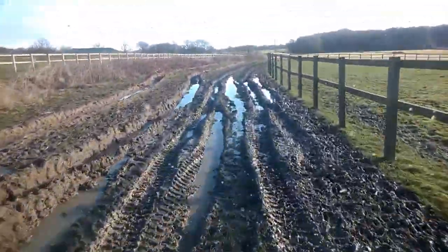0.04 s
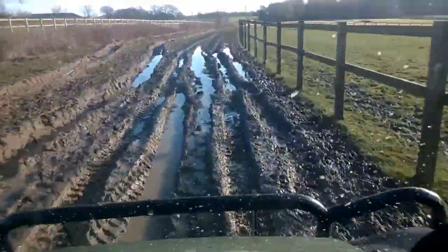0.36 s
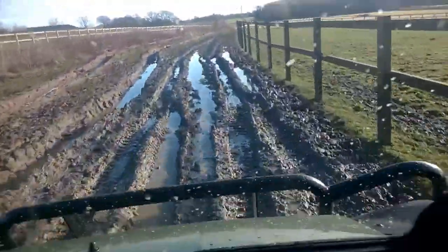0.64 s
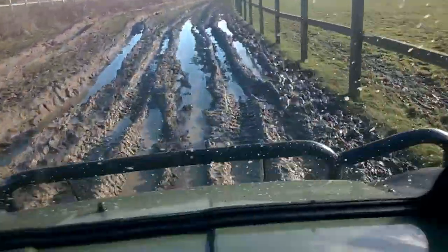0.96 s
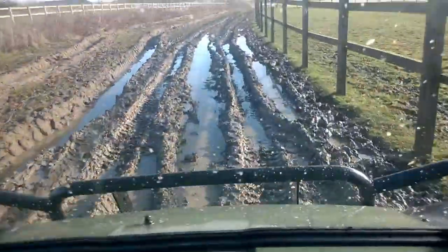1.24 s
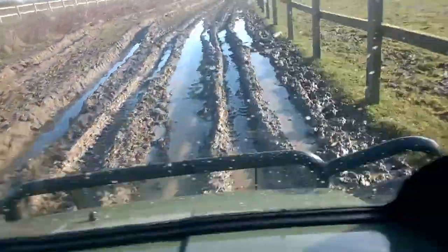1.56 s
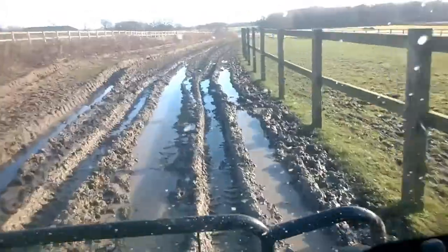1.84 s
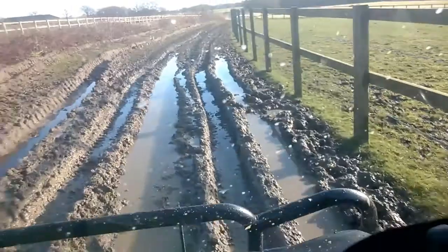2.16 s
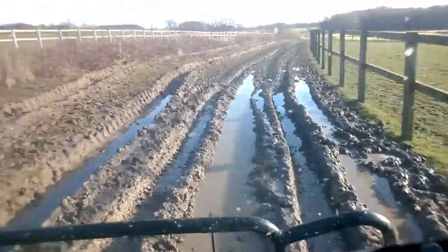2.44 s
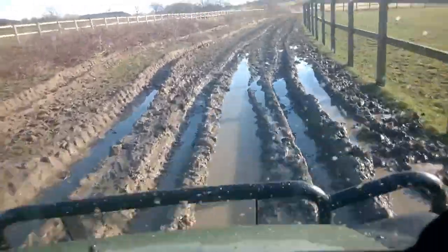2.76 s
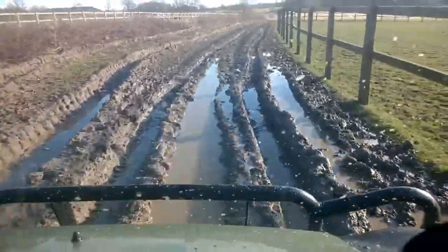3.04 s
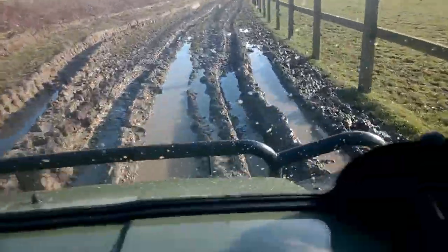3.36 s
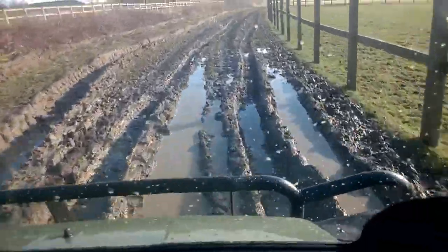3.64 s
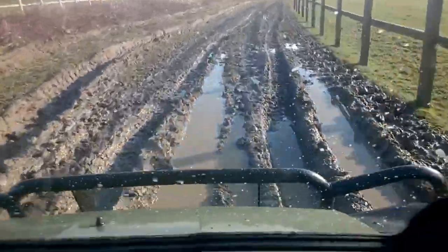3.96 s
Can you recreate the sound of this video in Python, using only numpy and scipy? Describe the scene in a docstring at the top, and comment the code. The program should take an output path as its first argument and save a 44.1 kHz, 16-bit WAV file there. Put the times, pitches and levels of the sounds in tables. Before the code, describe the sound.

An off-road vehicle's engine rumbles, heard close from inside the cab on a muddy track. It sags almost to idle, then picks up again, while faint wet tyre hiss, short splashes, a knock and metal clinks come through.

```python
"""Muddy track, inside the cab

The microphone rides in an off-road vehicle at a crawl. Close up, the engine booms through the body,
sags almost to idle and picks up again, over machinery noise and a humming cab resonance.
From outside and below come wet tyre hiss, grit and, at first, a wash of churned water.
The ruts bring short splashes, a knock, brief high swishes and a few clinks of loose metal."""
import sys
import numpy as np
from scipy import signal
from scipy.fft import rfft, irfft
from scipy.io import wavfile

SR = 44100
rng = np.random.default_rng(int(sys.argv[2]) if len(sys.argv) > 2 else 0)


def to_wav(sig):
    """Store sig (one row per channel, or 1-D mono) as 16-bit WAV at the path in sys.argv[1].

    Samples outside -1..1 are clipped; the rate is SR.
    """
    pcm = np.clip(np.atleast_2d(sig), -1, 1) * 32767
    pcm = np.round(pcm).astype(np.int16)
    wavfile.write(sys.argv[1], SR, pcm.T)  # frames by channels


N = 176400
TIME, FREQS = np.arange(N) / SR, np.fft.rfftfreq(N, 1 / SR)


def amp(db):
    """Decibels to gain."""
    return 10 ** (np.asarray(db) / 20)


def unit(x):
    """Scales to rms 1."""
    return x / np.sqrt(np.mean(x ** 2) + 1e-20)


def curve(rows, column=1):
    """One column of a time table, joined by straight lines."""
    rows = np.array(rows)
    return np.interp(TIME, rows[:, 0], rows[:, column])


def response(spectrum, hz):
    """Gain of a spectrum at the given frequencies."""
    f, db = np.transpose(spectrum)
    return amp(np.interp(np.log(hz + 1), np.log(f), db))


def colour(x, spectrum):
    """Filters x by a spectrum and scales it to rms 1."""
    return unit(irfft(rfft(x) * response(spectrum, FREQS), N))


def noise():
    """White noise."""
    return rng.standard_normal(N)


def drift(rate_hz):
    """Smooth random motion of rms 1."""
    return unit(irfft(rfft(noise()) * np.exp(-(FREQS / rate_hz) ** 2) * (FREQS > 0), N))


# Engine boom at the microphone: t/s, firing rate f/Hz, level/dB of harmonics 1, 2 and 3
FIRING = [(0, 72, -19.5, -30, -35), (.3, 71.37, -20, -36, -38), (.52, 72.36, -20.5, -35.5, -37),
          (.77, 69.73, -20, -32, -42.5), (1.12, 67.85, -19.5, -30.5, -47), (1.47, 63.4, -20.5, -49, -52.5),
          (1.8, 51.98, -21, -65, -54), (2.02, 46.22, -21.5, -60, -45), (2.16, 45.2, -22.5, -34, -40.5),
          (2.26, 53, -26, -38, -33), (2.38, 60.65, -21.5, -41.5, -36), (2.5, 62.3, -19, -35, -46),
          (2.75, 69.45, -17.5, -27, -40.5), (2.97, 60.3, -21.5, -42.5, -60), (3.1, 62.8, -18.5, -33, -67),
          (3.27, 69.3, -19, -27.5, -40), (3.55, 70.42, -18.5, -27, -39), (4, 75.7, -19, -30, -40)]
# Cab response to harmonics 4 and up: f/Hz, level/dB
CAB_RESPONSE = [(185, -64.5), (228, -44.5), (250, -49.5), (270, -68), (288, -48.5), (308, -62),
                (405, -53.5), (600, -65)]
# Those harmonics fade as the engine labours near idle and bite as it picks up: t/s, gain/dB
BITE = [(0, 0), (1.7, 1), (2.1, -10), (2.3, 4.5), (2.55, -10)]
# Lines from uneven cylinders: multiple of the firing rate, level/dB against harmonic 1
UNEVEN_LINES = [(4 / 3, -22.5), (7 / 3, -33)]
# Low shake of the body: t/s, level/dB at 2/3 of the firing rate, level/dB at half of it
BODY_SHAKE = [(0, -35, -38), (.17, -38, -47), (.35, -26, -44), (.55, -32, -46), (.85, -23.5, -48),
              (1.33, -23.5, -48), (1.55, -39, -48), (2.4, -38, -46), (2.6, -34, -37), (4, -31, -33)]
def engine():
    """Firing pulses boom in the cab; uneven cylinders and body shake beat against them."""
    steady_db, loose_db, fall_db_per_harmonic = .55, 3, 3.5
    firing_hz = curve(FIRING)
    cycles = np.cumsum(firing_hz) / SR + .005 * drift(rate_hz=72)  # slight timing jitter

    def tone(multiple, db, wobble_db):
        """A multiple of the firing rate with a wavering level."""
        peak = np.sqrt(2) * amp(db + wobble_db * drift(rate_hz=6.9))
        return peak * np.cos(2 * np.pi * multiple * cycles)

    boom = sum(tone(k, curve(FIRING, column=k + 1), steady_db) for k in range(1, 4))
    upper = sum(response(CAB_RESPONSE, k * firing_hz) * tone(k, -fall_db_per_harmonic * (k - 4), loose_db)
                for k in range(4, 13))
    uneven = sum(tone(k, curve(FIRING, column=2) + db, loose_db) for k, db in UNEVEN_LINES)
    shake = tone(2 / 3, curve(BODY_SHAKE), steady_db)
    shake += tone(1 / 2, curve(BODY_SHAKE, column=2), loose_db)
    return boom + amp(curve(BITE)) * upper + uneven + shake


# Machinery noise in the cab: f/Hz, relative level/dB
MACHINE_SPECTRUM = [(20, -5.5), (32, 18), (60, 9), (110, 3.5), (180, 3), (340, -6), (510, -11), (615, -5.5),
                    (740, -9.7), (850, -8), (980, -11.5), (1200, -14.5), (1900, -15), (2600, -14.5),
                    (3050, -19.5), (4000, -26.5), (7000, -40), (16000, -67)]
# Its strength along the track: t/s, level/dB
MACHINE_LEVEL = [(0, -35), (.5, -34.5), (.9, -34.5), (1.3, -36), (1.65, -35.5), (2.5, -34.5), (2.8, -34),
                 (3.1, -37), (3.3, -34), (4, -33.5)]
def machinery():
    """Noise of engine and drive in the cab's resonances, with a slight flutter."""
    drive = noise() * amp(1.1 * drift(rate_hz=28))
    return amp(curve(MACHINE_LEVEL)) * colour(drive, MACHINE_SPECTRUM)


# Wet tyres, heard from inside: f/Hz, relative level/dB
HISS_SPECTRUM = [(20, -27), (2000, 2), (4300, -0.5), (5400, 3), (6500, 2.5), (7600, -6), (8800, -7),
                 (16000, -15)]
# Their hiss along the track: t/s, level/dB
HISS_LEVEL = [(0, -54), (1.05, -53.5), (1.3, -57), (1.65, -51.5), (2, -52.5), (2.35, -50), (2.55, -53),
              (3.15, -56), (3.35, -52), (4, -53.5)]
# Grit on the body: f/Hz, relative level/dB
GRIT_SPECTRUM = [(100, -35), (700, -3), (2500, 7.5), (6000, -11), (16000, -22)]
def tyres():
    """Wet hiss from below the cab, with small ticks of mud and grit against the body."""
    ticks_per_s, tick_s, grit_db = 160, .002, -56.5
    hiss = colour(noise(), HISS_SPECTRUM) * amp(curve(HISS_LEVEL) + .7 * drift(rate_hz=20))
    hits = (rng.random(N) < ticks_per_s / SR).astype(float)
    ticks = signal.lfilter([1], [1, -np.exp(-1 / (tick_s * SR))], hits) * noise()
    return hiss + amp(grit_db) * colour(ticks, GRIT_SPECTRUM)


# Water under the wheels: f/Hz, relative level/dB
WASH_SPECTRUM = [(300, -37), (800, 9.5), (950, -1), (1350, 2.5), (1900, -5), (4000, -20), (16000, -54)]
# It drops away early: t/s, level/dB
WASH_LEVEL = [(.5, -48), (.7, -73)]
def wash():
    """Water churned by the wheels."""
    return amp(curve(WASH_LEVEL)) * colour(noise(), WASH_SPECTRUM)


def burst(start, length, rise_s=.0057, fall_s=.0096):
    """Envelope of a splash or knock: a quick rise, then a decay from `length` seconds after the start."""
    t = TIME - start
    return np.clip(t / rise_s, 0, 1) * np.exp(-np.clip((t - length) / fall_s, 0, 20))


# Splashes in the ruts: start t/s, length/s, level/dB of slap, gush and spray, spray centre f/Hz
RUT_SPLASHES = [(0.434, 0.05, -50, -50, -54, 13000), (0.552, 0.019, -51.5, -59, -59, 8950),
                (1.58, .25, -69, -65, -65, 12000), (1.715, 0.025, -44.5, -49, -55, 12000),
                (1.739, 0.019, -36.5, -40, -52, 9200), (1.753, 0.0099, -63, -42.5, -50, 11500),
                (2.309, .014, -38.5, -50, -49, 8200)]
# Slap on the panels: f/Hz, relative level/dB
SLAP_SPECTRUM = [(100, -34), (1050, -10), (1400, -2), (1800, 1), (2400, -2.5), (2900, -12), (5000, -30),
                 (16000, -60)]
# The brighter gush: f/Hz, relative level/dB
GUSH_SPECTRUM = [(100, -50), (2000, -20), (3400, 1), (4300, 3.5), (5200, 9.5), (6300, 9.5), (7300, 2.5),
                 (16000, -15)]
def splashes():
    """Water just outside the cab: grainy bursts, each a slap on the panels, a gush and fine spray."""
    grain_db, spray_octaves = 3, .39
    slap, gush, drops = (noise() * amp(grain_db * drift(rate_hz=1700)) for _ in range(3))
    slap, gush = colour(slap, SLAP_SPECTRUM), colour(gush, GUSH_SPECTRUM)
    out = np.zeros(N)
    for start, length, slap_db, gush_db, spray_db, spray_hz in RUT_SPLASHES:
        band = 1 / (1 + (np.log2((FREQS + 1) / spray_hz) / spray_octaves) ** 2)
        spray = unit(irfft(rfft(drops) * band, N))
        out += burst(start, length) * (amp(slap_db) * slap + amp(gush_db) * gush + amp(spray_db) * spray)
    return out


# The knock, heard from within the body: f/Hz, relative level/dB
KNOCK_SPECTRUM = [(500, -20), (1250, 0), (2100, -9), (3500, -1), (4600, -14), (6400, -11), (9000, -32)]
def knock():
    """A jolt knocks the body: a hollow rap with a crack above it."""
    return amp(-37) * burst(start=.481, length=.012) * colour(noise(), KNOCK_SPECTRUM)


# High swishes: middle t/s, length/s, level/dB
SWISH_SWELLS = [(.54, 0.073, -53.5), (1.145, 0.072, -52.5), (1.432, .06, -56.5), (1.84, 0.074, -56),
                (2.82, 0.1, -57)]
# Their narrow band: f/Hz, relative level/dB
SWISH_SPECTRUM = [(100, -54), (4800, -19), (5800, -8), (6450, -6), (7000, -15), (7800, -22), (16000, -60)]
def swishes():
    """A narrow high hiss swells and fades as the vehicle rocks."""
    swells = sum(amp(db) * np.exp(-2 * ((TIME - middle) / length) ** 2)
                 for middle, length, db in SWISH_SWELLS)
    return swells * colour(noise(), SWISH_SPECTRUM)


# Blows on loose metal: t/s, clatter level/dB, ring level/dB
METAL_BLOWS = [(.787, -41, -56), (1.119, -41, -58), (1.72, -41, -42), (2.17, -35.5, -44.5),
               (2.249, -49, -42.5), (2.407, -35.5, -45)]
# The clatter: f/Hz, relative level/dB
CLATTER_SPECTRUM = [(1300, -26), (2050, -11), (2400, 0), (2700, -1.5), (3500, -19), (4600, -13),
                    (12000, -38)]
# Modes of the ring: f/Hz, relative level/dB, t60/s
METAL_MODES = [(2330, 0, .1), (4667, -2.5, .08)]
def clinks():
    """Loose metal clatters for an instant; a clean blow leaves it ringing."""
    rise_s, fall_s = .002, .012
    out, rattle = np.zeros(N), colour(noise(), CLATTER_SPECTRUM)
    for start, clatter_db, ring_db in METAL_BLOWS:
        t = np.maximum(TIME - start, 0)
        clatter = np.exp(-t / fall_s) * rattle
        ring = sum(amp(db - 60 * t / t60) * np.sin(2 * np.pi * hz * t) for hz, db, t60 in METAL_MODES)
        out += np.minimum(t / rise_s, 1) * (amp(clatter_db) * clatter + amp(ring_db) * ring)
    return out


# Hum around the microphone, swelling as the load shifts: t/s, level/dB
HUM_LEVEL = [(1.25, -62), (1.47, -48), (1.8, -63.5), (2.12, -51.5), (2.3, -52.5), (3, -55.5), (3.3, -44.5),
             (3.55, -55.5), (4, -58)]
def cab_hum():
    """Vibration keeps one narrow cab resonance ringing."""
    centre_hz, half_width_hz = 402, 27
    resonance = 1 / (1 + ((FREQS - centre_hz) / half_width_hz) ** 4)
    return amp(curve(HUM_LEVEL)) * unit(irfft(rfft(noise()) * resonance, N))


def scene():
    """Everything as it reaches one microphone in the cab."""
    vehicle = engine() + machinery() + cab_hum()
    track = tyres() + wash() + splashes() + knock() + clinks() + swishes()
    return (vehicle + track)[None]


def record(dry):
    """The microphone sheds the deepest rumble; soft ends, then the band limit."""
    low_cut_hz, top_hz, fade_s = 21, 15700, .004
    low_cut = signal.butter(3, low_cut_hz, "highpass", fs=SR, output="sos")
    thinned = signal.sosfiltfilt(low_cut, dry, padtype="even", padlen=SR // 4)
    ends = np.clip(np.minimum(TIME, TIME[::-1]) / fade_s, 0, 1)
    band_limit = signal.firwin(1023, top_hz, window=("kaiser", 9), fs=SR)
    return signal.oaconvolve(thinned * ends, band_limit[None], "same")


dry = scene()
out = record(dry)
to_wav(out)
```